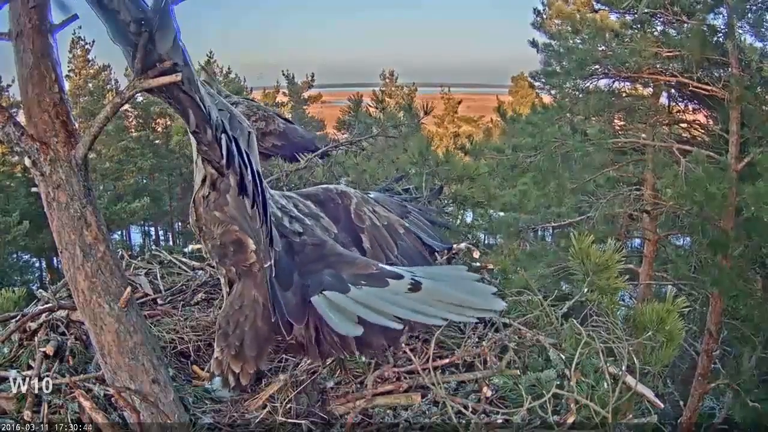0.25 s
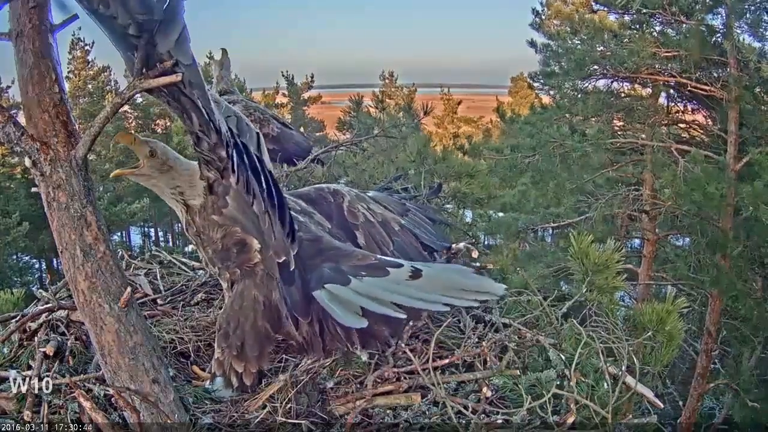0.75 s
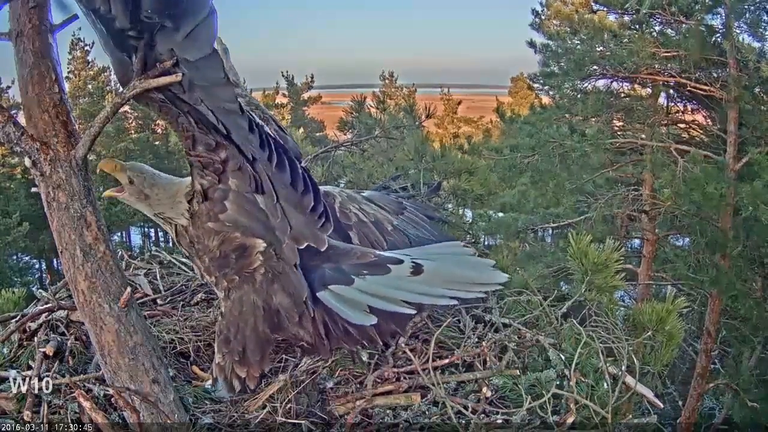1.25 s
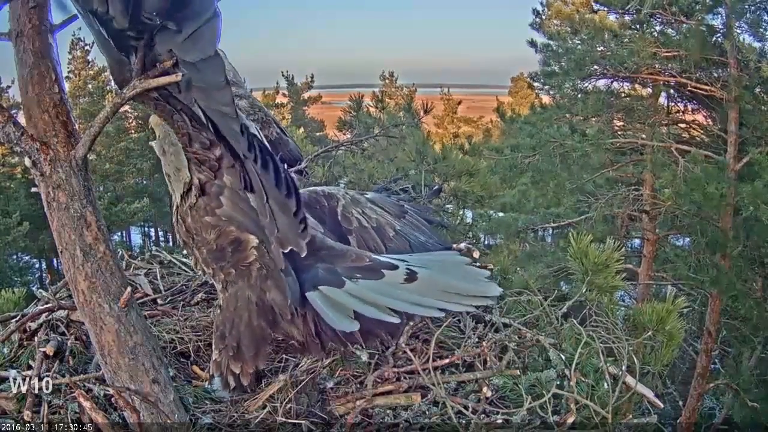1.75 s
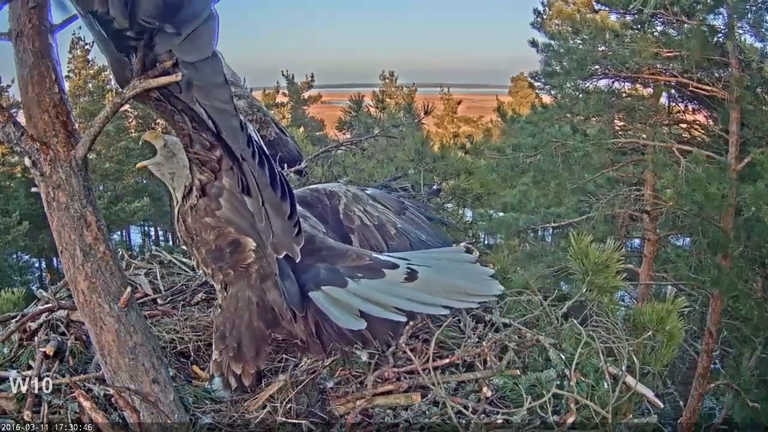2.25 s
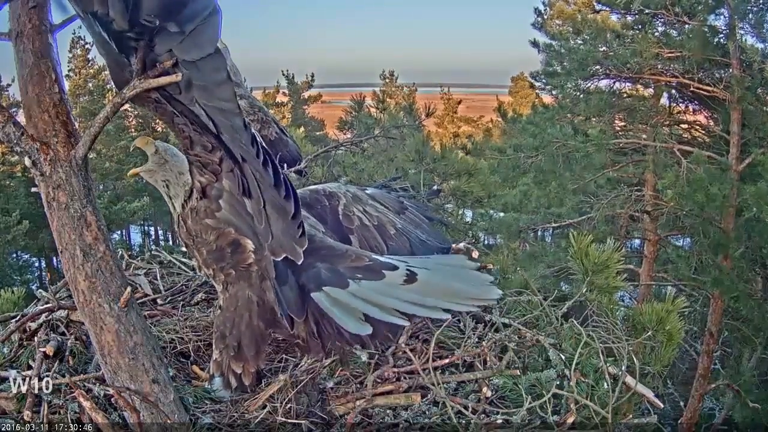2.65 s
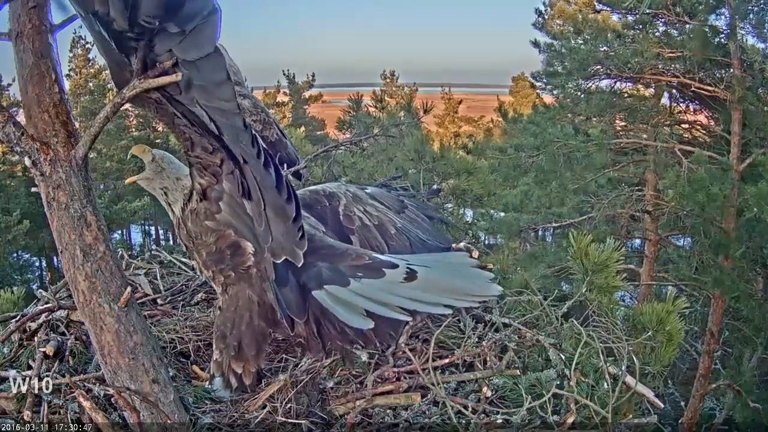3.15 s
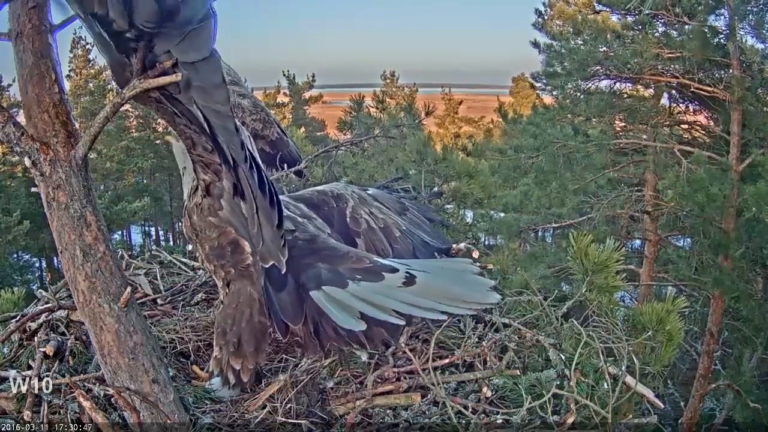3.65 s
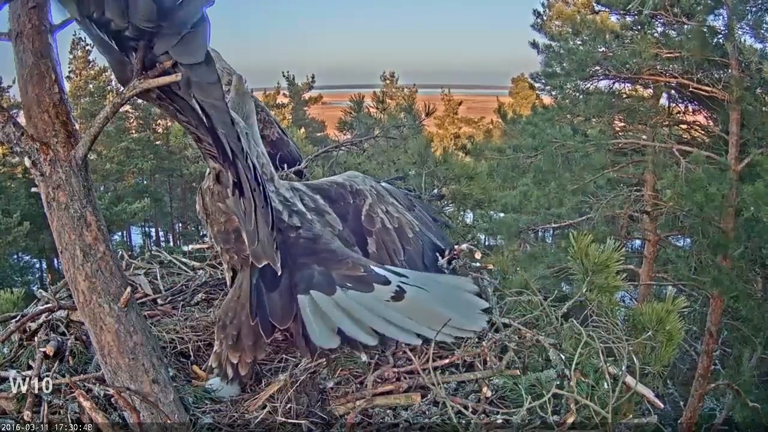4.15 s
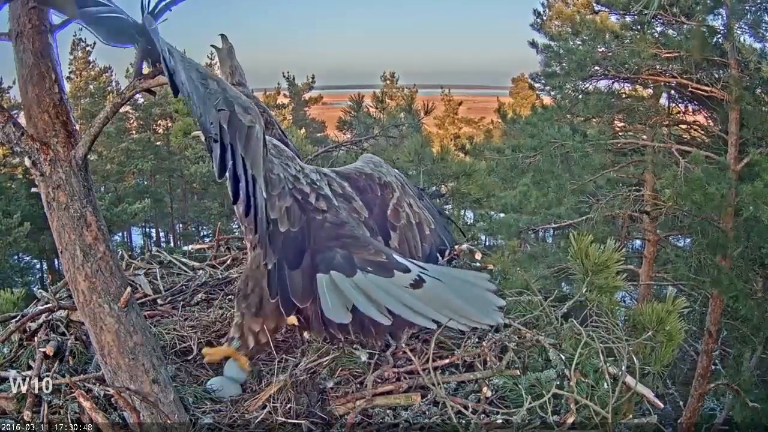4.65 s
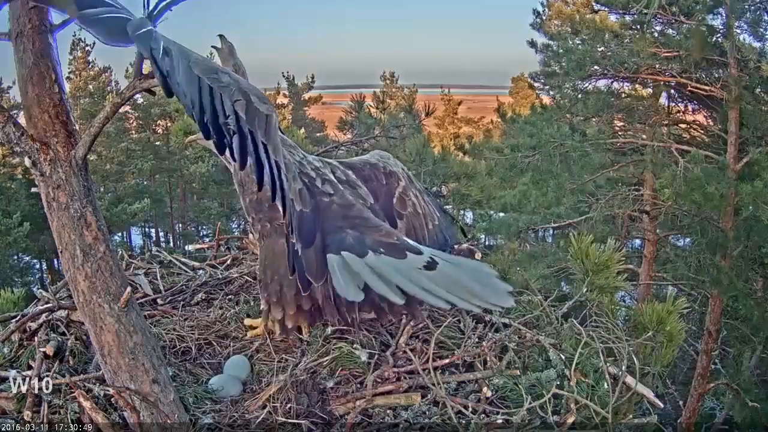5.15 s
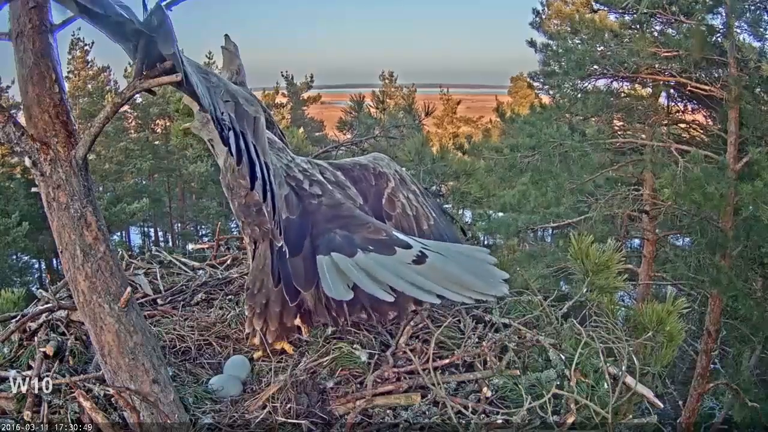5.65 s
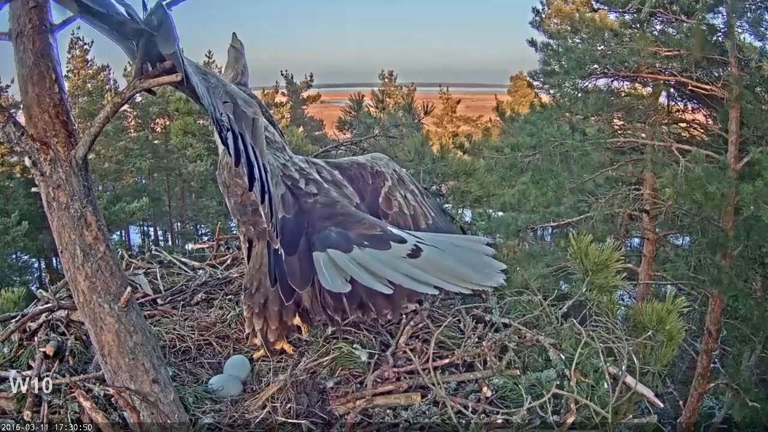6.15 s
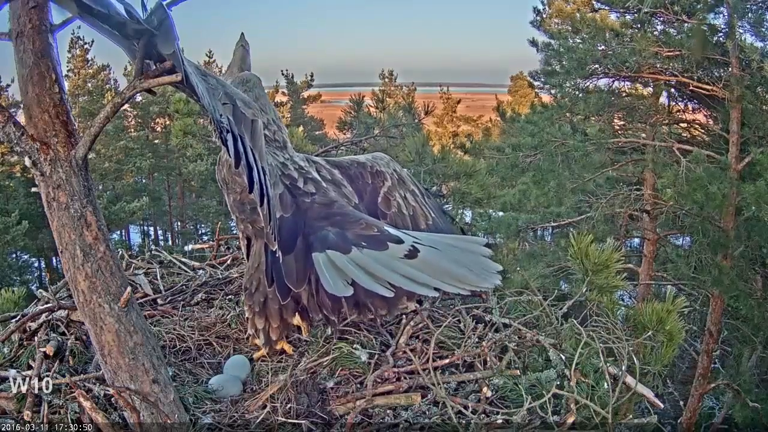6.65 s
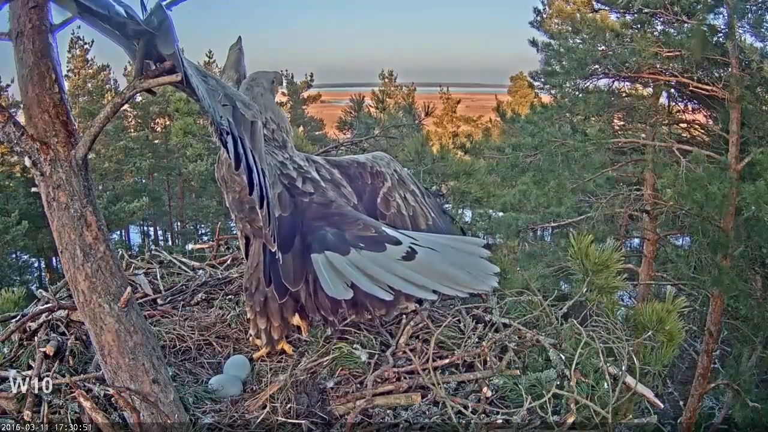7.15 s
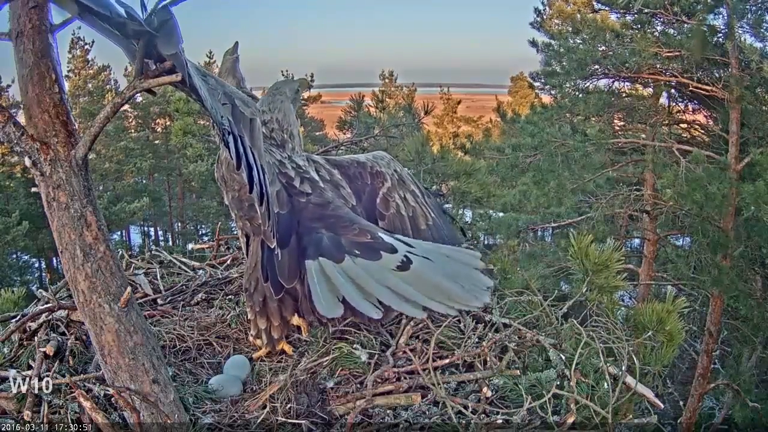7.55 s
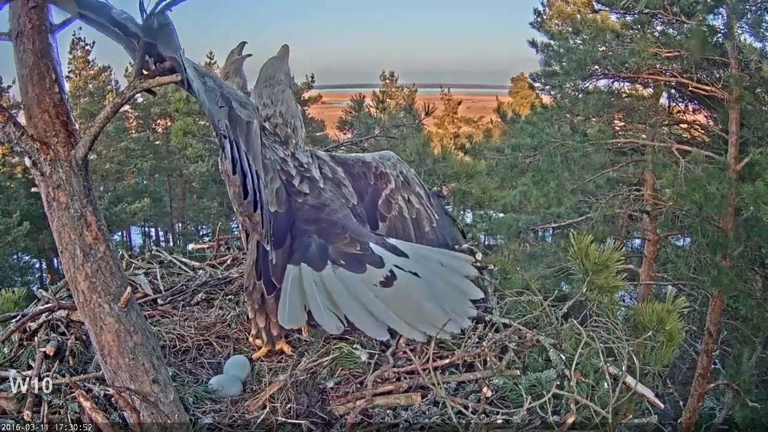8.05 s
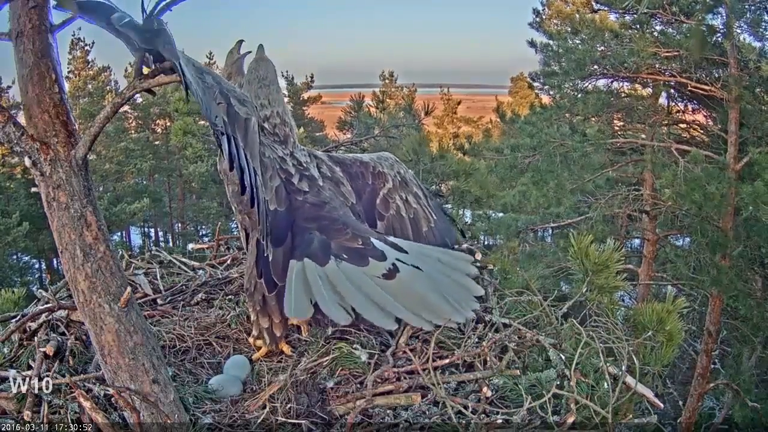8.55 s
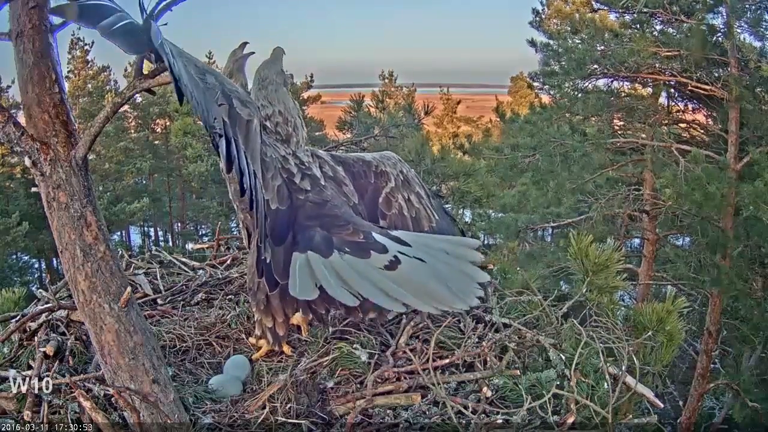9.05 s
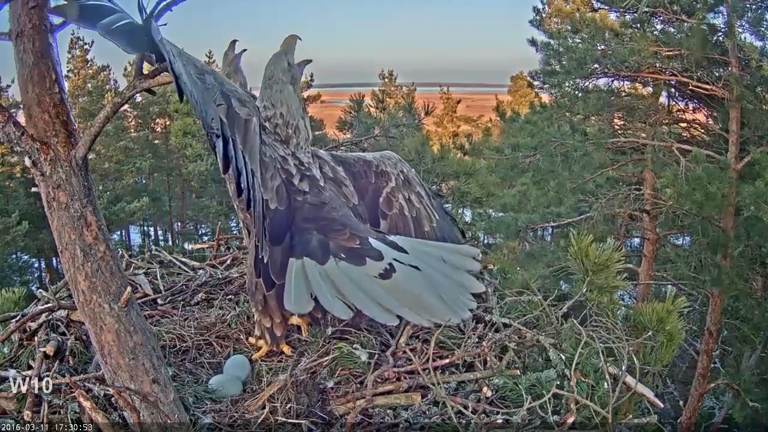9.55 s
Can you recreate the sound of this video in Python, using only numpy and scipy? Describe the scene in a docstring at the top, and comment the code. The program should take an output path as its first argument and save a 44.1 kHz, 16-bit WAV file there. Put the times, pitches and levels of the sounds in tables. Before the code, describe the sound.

Two eagles call together on a nest high in a pine forest. The near one gives quick, piercing yelps, loud enough to distort the microphone briefly, while its mate yelps more slowly and softly with more echo. Small throat rattles, squeaks, wheezes and clucks fall between calls. Past the middle the mate calls alone, then the near bird returns more quietly. A faint hush of air lies underneath.

```python
"""Two sea eagles yelp a duet on their nest, high in a pine forest, over a faint hush of air.
The mate starts: each low note swells, then flips up to a high one. At once the near bird joins in with
yelps that stutter, break upward and arch over, loud enough to overload the microphone. The trees echo.
Throat rattles, then squeaks, wheezes and clucks fall between the calls. From about 6 seconds
the mate calls alone; near 7.7 seconds the near bird returns, and both yelp on to the end."""
import sys
import numpy as np
from scipy import signal
from scipy.fft import rfft, irfft
from scipy.io import wavfile

SR = 44100
rng = np.random.default_rng(int(sys.argv[2]) if len(sys.argv) > 2 else 0)


def output_pcm(signal):
    """Save a mono or channel-first signal as 16-bit PCM at the path in sys.argv[1].

    Samples are clipped to [-1, 1] before scaling.
    """
    pcm = np.clip(np.atleast_2d(signal).T, -1, 1) * 32767
    wavfile.write(sys.argv[1], SR, np.round(pcm).astype(np.int16))


N = 431725

# The mate's yelps. Each row: start and length in seconds, top pitch in Hz,
# levels of the low note and of the high note in dB (before the swell and fade).
MATE_CALLS = [(0.046, 0.078, 2058, 0.5, -12), (0.315, 0.077, 2066, -1, -17.5),
              (.636, 0.08, 2052, -7, -20.5), (1.847, 0.062, 1910, -6, -22), (2.624, 0.063, 1990, -7, -23.5),
              (2.903, 0.065, 2017, -5.5, -16.5), (3.462, 0.063, 1951, -0.5, -21),
              (3.74, 0.058, 1947, -1, -14.5), (4.012, 0.053, 1825, -4.5, -21),
              (4.266, 0.081, 2027, 6.5, -20.5), (4.6, 0.09, 2023, -10.5, -17.5),
              (4.864, 0.083, 1969, -13, -17), (5.144, 0.063, 1917, -3, -16),
              (5.449, 0.059, 1808, -2.5, -18), (5.755, 0.072, 1816, -2, -15.5),
              (6.059, 0.075, 1757, -3, -15.5), (6.361, 0.067, 1759, -3.5, -16),
              (6.676, 0.074, 1759, -5, -16), (7.015, 0.08, 1669, -2.5, -18), (7.373, 0.077, 1778, 0.5, -17),
              (7.673, 0.07, 1853, 0.5, -13), (7.961, 0.074, 1889, -9, -14), (8.233, 0.068, 2050, 1, -13),
              (8.49, 0.079, 2080, -10.5, -13), (8.809, 0.083, 2098, -9.5, -14),
              (9.091, 0.08, 2105, 1.5, -15.5), (9.366, 0.069, 1848, -6, -18),
              (9.638, 0.084, 2065, -7, -14.5)]
# The near bird's yelps. Each row: start and length in seconds, top pitch in Hz, level in dB,
# ending ("rattle", "squeak" or a plain "stop").
NEAR_CALLS = [(0.071, 0.082, 1541, 0, "rattle"), (0.276, .075, 1510, -3.5, "rattle"),
              (0.48, 0.075, 1500, -4, "rattle"), (0.682, 0.073, 1509, 5, "rattle"),
              (0.882, 0.086, 1491, 10.5, "squeak"), (1.098, 0.087, 1490, 10, "squeak"),
              (1.319, 0.08, 1515, 9, "rattle"), (1.538, 0.066, 1554, 5.5, "rattle"),
              (1.747, 0.026, 1500, -1.5, "stop"), (2.089, .112, 1558, -0.5, "rattle"),
              (2.325, 0.078, 1500, 0, "rattle"), (2.535, 0.081, 1482, 2.5, "squeak"),
              (2.757, 0.081, 1484, 3, "rattle"), (2.99, 0.07, 1483, 3.5, "squeak"),
              (3.197, .078, 1480, 4, "rattle"), (3.413, 0.064, 1511, 2.5, "rattle"),
              (3.622, 0.029, 1363, -7, "stop"), (3.956, .052, 1446, -6, "stop"),
              (4.243, 0.079, 1643, -5, "rattle"), (4.441, 0.09, 1512, -5, "squeak"),
              (4.652, 0.079, 1468, -4, "squeak"), (4.871, 0.081, 1510, 1.5, "squeak"),
              (5.096, 0.078, 1525, 2, "rattle"), (5.317, 0.08, 1532, 2.5, "squeak"),
              (5.557, 0.082, 1501, 3, "squeak"), (5.835, 0.1, 1251, -6.5, "squeak"),
              (7.68, 0.063, 1473, -12.5, "rattle"), (7.848, 0.029, 1410, -8, "stop"),
              (8.212, 0.036, 1522, -5, "stop"), (8.672, 0.07, 1719, -3, "rattle"),
              (8.889, 0.063, 1550, -4.5, "rattle"), (9.089, 0.065, 1579, -5.5, "rattle"),
              (9.295, 0.073, 1548, -4.5, "rattle"), (9.511, 0.071, 1536, -5, "rattle"),
              (9.738, 0.053, 1440, -5.5, "stop")]


def from_db(db):
    """Turn decibels into a number to multiply a sound by."""
    return 10 ** (np.asarray(db) / 20)


def at_time(curve, seconds):
    """Read a level curve in dB at the given times."""
    return np.interp(seconds, *np.transpose(curve))


def at_hz(spectrum, hz):
    """Read a spectrum (a level for each frequency) in dB at the given frequencies."""
    points, db = np.transpose(spectrum)
    return np.interp(np.log(hz), np.log(points), db)


def add(track, start_s, sound):
    """Mix a sound into a track."""
    at = max(int(start_s * SR), 0)
    track[at:at + len(sound)] += sound[:max(len(track) - at, 0)]


def wobble(size, hz):
    """Random motion up to about the given rate, with a typical size of 1."""
    slow = signal.sosfilt(signal.butter(2, hz, fs=SR, output="sos"), rng.standard_normal(size + 2000))
    return slow[2000:] / slow[2000:].std()


def coloured_noise(spectrum, size):
    """Noise with the given spectrum and a typical size of 1."""
    gain = from_db(at_hz(spectrum, np.fft.rfftfreq(size, 1 / SR) + 1))
    noise = irfft(rfft(rng.standard_normal(size)) * gain, size)
    return noise / noise.std()


def resonate(x, hz, width):
    """Let a sound ring at one frequency; a narrower width rings longer."""
    r = np.exp(-np.pi * width / SR)
    feedback = [1, -2 * r * np.cos(2 * np.pi * hz / SR), r * r]
    return signal.lfilter(np.array([1, 0, -1]) * (1 - r * r) / 2, feedback, x + 1e-18)


def dull(x, hz):
    """Take the treble off."""
    return signal.sosfilt(signal.butter(4, hz, fs=SR, output="sos"), x + 1e-18)


def phase_of(hz):
    """Add up a changing pitch into the angle its wave has turned through."""
    return 2 * np.pi * np.cumsum(hz) / SR


def overtones(phase, hz, colour, hoarse=.25):
    """Overtones sweep through the resonances of throat and beak, each trembling on its own."""
    return sum(from_db(at_hz(colour, k * hz)) * (1 + hoarse * wobble(len(hz), hz=302))
               * np.cos(k * phase) for k in range(2, 8))


def background_air():
    """A low hush of air, calmest a little past the middle."""
    # The air's loudness. Each row: time in seconds, level in dB.
    loudness = [(0, -34.5), (3, -39.5), (5.6, -38), (6.2, -45), (7.4, -45), (8.4, -41.5), (9.7, -39.5)]
    # The air's tone. Each row: frequency in Hz, relative level in dB.
    colour = [(5, 9), (20, 10.5), (60, -9), (130, -6), (300, -13), (800, -16.5), (2000, -16), (4000, -28),
              (7000, -34.5), (14000, -40)]
    return from_db(at_time(loudness, np.arange(N) / SR)) * coloured_noise(colour, N)


def mate(rasp=.014, jitter=.002, flutter_db=1.5, hiss_db=-35):
    """A low reedy note swells and creeps up, then flips into a high one that levels off."""
    # How throat and beak shape the overtones. Each row: frequency in Hz, relative level in dB.
    colour = [(2000, 13), (2450, 23), (2850, -5.5), (3600, -1), (4150, -16), (4500, -19.5), (4800, -12.5),
              (5400, -14.5), (6300, -30), (7200, -19.5), (9000, -34.5), (13000, -53)]
    # Overtone strength through the duet. Each row: time in seconds, boost in dB.
    brightness = [(0, 6.5), (3.5, 3), (6, -0.5), (7.1, 2), (8, 4), (9.6, 4.5)]
    flip_at, flip_width, settle, peak_at = .33, .18, .139, .56  # shares of the yelp's length
    low_note, creep, shortfall = .61, .4305, .1141  # shares of the top pitch
    swell_db, fade_db, flip_lift_db = 28.5, 9.5, .5
    out = np.zeros(N)
    for start, length, top_hz, low_db, high_db in MATE_CALLS:
        stage = np.arange(int(1.25 * length * SR)) / (length * SR)
        high = np.clip(.5 + (stage - flip_at) / flip_width, 0, 1)  # 0 on the low note, 1 on the high
        high_note = 1 - shortfall * np.exp(-np.maximum(stage - flip_at, 0) / settle)
        hz = top_hz * ((1 - high) * (low_note + creep * stage) + high * high_note)
        swell = np.maximum(1 - stage / peak_at, 0)
        fade = np.maximum(stage - peak_at, 0) / (1 - peak_at)
        level_db = low_db + high * (high_db - low_db) - swell_db * swell - fade_db * fade ** 2
        level_db += flip_lift_db * np.sin(np.pi * high)
        strain = np.interp(top_hz, [1850, 2100], [0, 1])  # the highest yelps stay hoarse
        rough = np.interp(stage, [.25, .38, .65], [.15, 1, 0]) + 1.3 * strain
        phase = phase_of(hz * (1 + (jitter + rasp * rough) * wobble(len(stage), hz=456)))
        upper = overtones(phase, hz, colour)
        upper += from_db(hiss_db) * wobble(len(stage), hz=4960) * (1 + 2 * rough)
        upper *= from_db(at_time(brightness, start) + np.interp(high, [0, 1], [-21, -9.5]))
        level_db += flutter_db * wobble(len(stage), hz=260)
        envelope = np.interp(stage, [0, .06, 1.1, 1.25], [0, 1, 1, 0]) * from_db(level_db)
        add(out, start, np.sqrt(2) * envelope * (np.cos(phase) + upper))
    return out


def forest(x, nest_db, tail_db, echo_db, tail_s=1.0):
    """Sound scatters off trunk and nest, echoes from the trees, then dies away by 60 dB in tail_s."""
    # Echoes from the trees. Each row: delay in seconds, relative level in dB.
    echoes = [(.055, -34), (0.106, -29.5), (0.137, -35.5), (0.189, -48.5)]
    # The tone of what comes back. Each row: frequency in Hz, relative level in dB.
    colour = [(200, -20.5), (900, -8), (1250, 1), (1550, 6), (2200, 4), (3100, 12), (4500, 4.5), (7200, 7),
              (14000, -23.5)]
    t = np.arange(int(1.2 * SR)) / SR
    scatter = (t > .003) * np.exp(-t / .01)
    tail = (t > .02) * from_db(-120 * t / tail_s)
    power = from_db(nest_db) ** 2 * scatter / scatter.sum() + from_db(tail_db) ** 2 * tail / tail.sum()
    for delay, db in echoes:
        smear = (t > delay) * np.exp(-np.abs(t - delay) / .0056)
        power += from_db(db + echo_db) ** 2 * smear / smear.sum()
    return signal.fftconvolve(x, np.sqrt(power) * coloured_noise(colour, len(t)))[:N]


def near_bird(trees_follow=.31, rasp=.031, jitter=.0025, flutter_db=2.1, hiss_db=-54, beak_db=-37):
    """A rough stutter breaks into an arched whistle. Returns the direct sound and what the trees get."""
    # How throat and beak shape the overtones. Each row: frequency in Hz, relative level in dB.
    colour = [(1900, -17.5), (2450, -8.5), (2750, -23.5), (3050, -17), (3600, -24), (4500, -37),
              (6000, -36), (7500, -42.5), (12000, -66.5)]
    # Overtone strength through the duet. Each row: time in seconds, boost in dB.
    brightness = [(0, 2.5), (1.2, 1), (2.8, 2.5), (4.5, -1), (5.8, 0), (8.3, -1.5), (9.7, 2.5)]
    # Air forced through the beak with each cycle. Each row: frequency in Hz, relative level in dB.
    beak_air = [(1200, -26.5), (2500, -5), (3500, 9.5), (4600, -9), (7000, -7.5), (9000, -16), (14000, -25)]
    climb_s, break_s, break_width_s, sag_s = .025, .0317, .00377, .00644
    opening_drop, break_dip, end_drop = .29, .1064, .1586  # shares of the top pitch
    attack_s, attack_db, stutter_s, stutter_db = .025, 14, .00733, 16
    hold_db, break_dip_db, release_db_per_s, rough_boost_db = -3.5, 3, 3202, 1.5
    direct, to_trees = np.zeros((2, N))
    for start, length, top_hz, db, _ in NEAR_CALLS:
        t = np.arange(int((length + .018) * SR)) / SR
        # The pitch climbs, dips where the voice breaks and sags as the air runs out.
        climb = np.exp(-(t / climb_s) ** 3)
        voice_break = np.exp(-((t - break_s) / break_width_s) ** 2)
        sag = np.minimum(np.exp((t - length) / sag_s), 2)
        hz = top_hz * (1 - opening_drop * climb - break_dip * voice_break - end_drop * sag)
        # The level swells in a few stutters, holds and is cut off.
        opening = np.maximum(1 - t / attack_s, 0)
        stutter = opening * np.cos(np.pi * t / stutter_s) ** 2
        release = np.maximum(t - length + .0036, 0)
        level_db = hold_db - attack_db * opening - stutter_db * stutter
        level_db -= break_dip_db * voice_break + release_db_per_s * release
        # The voice box is unsteady at both ends; weaker yelps quaver all the way through.
        rough = np.clip(np.maximum((break_s + .0076 - t) / .018, sag), 0, 1)
        quaver = np.interp(db, [-6, 2], [.4, .15])
        phase = phase_of(hz * (1 + (jitter + rasp * rough) * wobble(len(t), hz=428)))
        level_db += flutter_db * (rough + quaver) * wobble(len(t), hz=187)
        overtone_gain = from_db(at_time(brightness, start) + rough_boost_db * rough)
        tone = np.cos(phase) + overtone_gain * overtones(phase, hz, colour)
        hiss = from_db(hiss_db) * wobble(len(t), hz=4000) * (1 + rough)
        hiss += from_db(beak_db) * coloured_noise(beak_air, len(t))
        envelope = np.minimum(t / .0011, 1) * from_db(level_db)
        yelp = np.sqrt(2) * envelope * (tone + hiss * (1 + np.cos(phase)))
        # The level swings as the beak turns; the trees get only a share of that swing.
        add(direct, start, from_db(db) * yelp)
        add(to_trees, start, from_db(trees_follow * db) * yelp)
    return direct, to_trees


def rattle(level_db, chest_db, gap_s=.006, soft_hz=1300, hard_hz=2200, wet_db=-17, wet_s=.0022):
    """Five uneven, wet pulses ring the throat; harder ones come further apart and sound brighter."""
    # The throat's resonances. Each row: frequency before stretching in Hz, width in Hz, level in dB.
    throat = [(230, 120, 13.5), (460, 520, 5), (793, 70, 6.5), (1500, 120, -2)]
    effort = np.interp(level_db, [-21, -13], [0, 1])
    gaps = gap_s * (1 + .4 * effort) * rng.uniform(.3, 1.7, size=5)
    strengths_db = np.array([-4.5, -2, -1, 1.5, -6.5]) - 4 * effort * np.arange(5)
    strengths_db += rng.normal(0, 3, size=5)
    pulses = np.zeros(SR // 8)
    pulses[((np.cumsum(gaps) - gaps[0]) * SR).astype(int)] = from_db(strengths_db)
    pulse_tails = signal.lfilter([1], [1, -np.exp(-1 / (wet_s * SR))], pulses)
    crackle = pulse_tails * rng.standard_normal(len(pulses))
    pulses = dull(pulses + from_db(wet_db) * crackle, soft_hz + effort * (hard_hz - soft_hz))
    stretch = rng.uniform(.705, 1.247)  # the neck is held differently each time
    bass_db = chest_db - 4.6 * effort  # for the lowest resonance only
    croak = sum(from_db(db + (k == 0) * bass_db) * resonate(pulses, hz * stretch, width)
                for k, (hz, width, db) in enumerate(throat))
    return from_db(level_db + 3) * croak / np.abs(croak).max()


def squeak(peak_db, hz, length_s=.01106, fall=.32, octave_db=-18):
    """The voice box sounds once more for a few cycles, falling in pitch as the pressure drops."""
    stage = np.linspace(0, 1, int(length_s * SR))
    phase = phase_of(hz * (1 + fall * (.5 - stage) + .04 * wobble(len(stage), hz=600)))
    tone = np.sin(phase) + from_db(octave_db) * np.sin(2 * phase)
    return from_db(peak_db) * np.sin(np.pi * stage) * tone


def throat_sounds(spread_db=3.0, squeak_hz=1346):
    """Most near yelps end in a squeak or rattle, the mate's in a deep rattle; a few sounds come alone."""
    # Sharp squeaks on their own. Each row: start in seconds, peak level in dB, pitch in Hz.
    lone_squeaks = [(1.893, -5.5, 1550), (3.7662, -4.5, 1654), (4.053, -3, 1605), (4.068, -4.5, 1573),
                    (7.985, -13.5, 1803)]
    # Hard clucks after yelps that stop short. Each row: start in seconds, level in dB.
    clucks = [(1.907, -5.5), (3.799, -7.5), (4.1, -9.5), (8.008, -8), (8.034, -11.5), (8.371, -7.5)]
    out = np.zeros(N)
    for start, length, _, _, ending in NEAR_CALLS:
        end = start + length
        if ending == "squeak":
            add(out, end + .008, squeak(rng.normal(-6, spread_db), squeak_hz * rng.normal(1, .1)))
        elif ending == "rattle":
            add(out, end + .02, rattle(rng.normal(-15, spread_db), chest_db=-6.5))
    for start, length, *_ in MATE_CALLS:
        add(out, start + length + .025, rattle(level_db=-21, chest_db=7))
    for start, db, hz in lone_squeaks:
        add(out, start, squeak(db, hz))
    for start, db in clucks:
        add(out, start, rattle(db, chest_db=-11))
    return out


def wheezes(grain_db=4):
    """Brief scratchy, breathy hisses around the yelps that stop short."""
    # The wheezes. Each row: start in seconds, length in seconds, level in dB.
    hisses = [(1.865, 0.048, -36), (3.791, 0.12, -51), (4.022, 0.084, -36), (7.935, 0.14, -40),
              (8.226, 0.16, -49), (8.296, 0.091, -36.5)]
    # Their tone. Each row: frequency in Hz, relative level in dB.
    colour = [(1000, -32.5), (2300, 17), (4000, 2), (5800, 12), (8000, -16), (13000, -13.5)]
    out = np.zeros(N)
    for start, length, db in hisses:
        size = int(length * SR)
        envelope = np.hanning(size) * from_db(db + grain_db * wobble(size, hz=300))
        add(out, start, envelope * coloured_noise(colour, size))
    return out


def scene():
    """Both birds, their echoes and the still air; the mate has the stronger echoes."""
    yelps, to_trees = near_bird()
    small_sounds = throat_sounds() + wheezes()
    mate_yelps = mate()
    near = yelps + small_sounds + forest(to_trees + small_sounds, nest_db=-18, tail_db=-27, echo_db=-4)
    far = mate_yelps + forest(mate_yelps, nest_db=-9, tail_db=-17.5, echo_db=10)
    return (near + far + background_air())[None]


def record(dry, lopsided=.015, duck_db=4.0, cutoff_hz=14500):
    """Loud peaks overload, a little lopsidedly; the level sinks while they do; the top treble is cut."""
    fine = signal.resample_poly(dry[0], up=2, down=1)  # twice the samples, for cleaner clipping
    clipped = fine / (1 + np.abs(fine) ** 24) ** (1 / 24)
    overload = np.minimum(np.abs(fine - clipped), 1)
    memory = np.exp(-30 / SR)  # smooths the overload over about 17 milliseconds
    gain_db = -duck_db * signal.lfilter([1 - memory], [1, -memory], overload)
    out = signal.resample_poly((clipped + lopsided * overload) * from_db(gain_db), up=1, down=2)
    return signal.sosfilt(signal.ellip(10, .2, 70, cutoff_hz, fs=SR, output="sos"), out)[None]


dry = scene()
out = record(dry)
output_pcm(out)
```